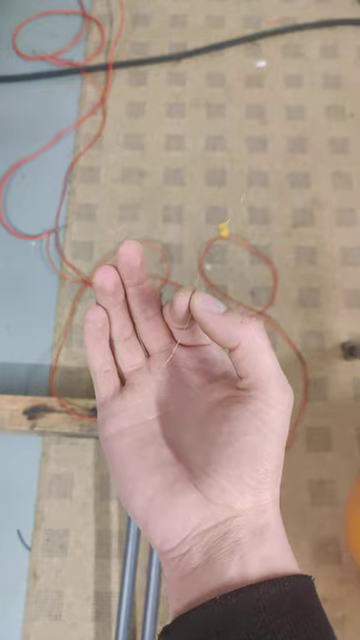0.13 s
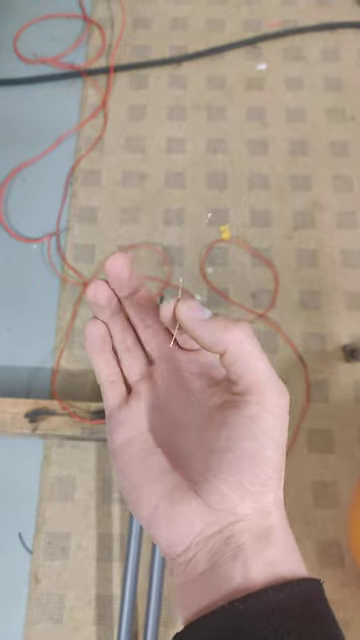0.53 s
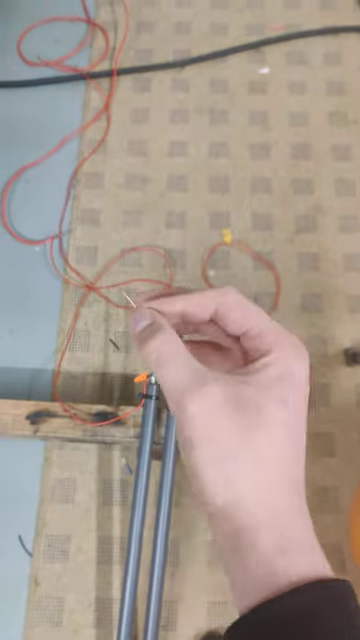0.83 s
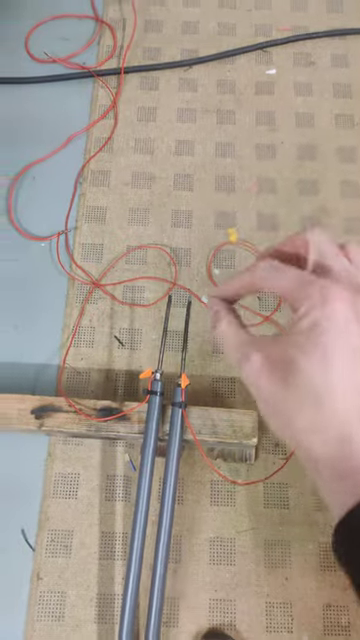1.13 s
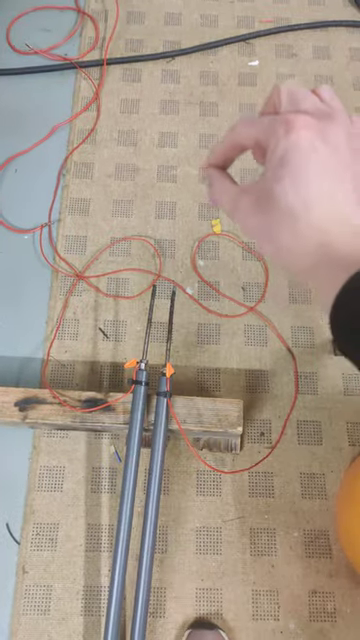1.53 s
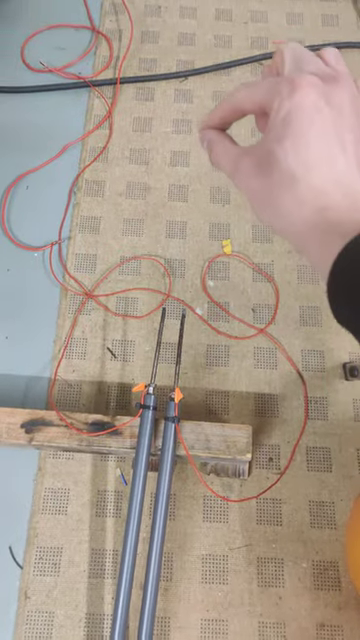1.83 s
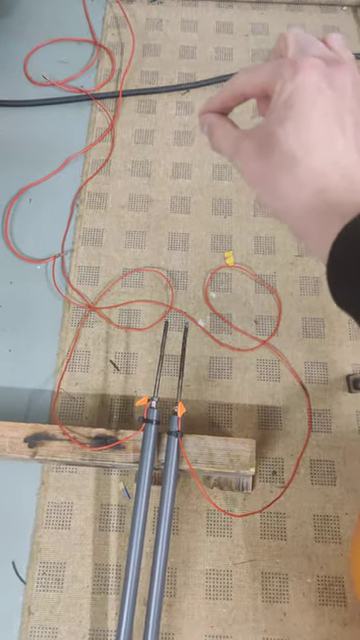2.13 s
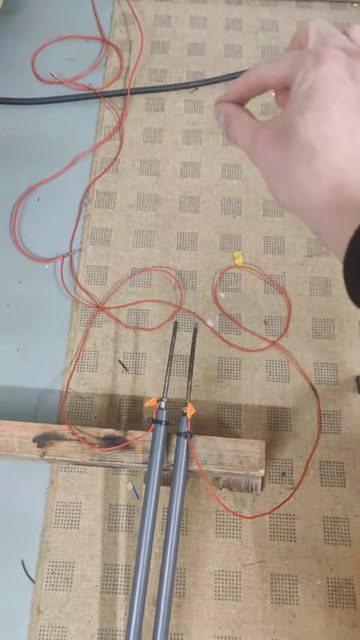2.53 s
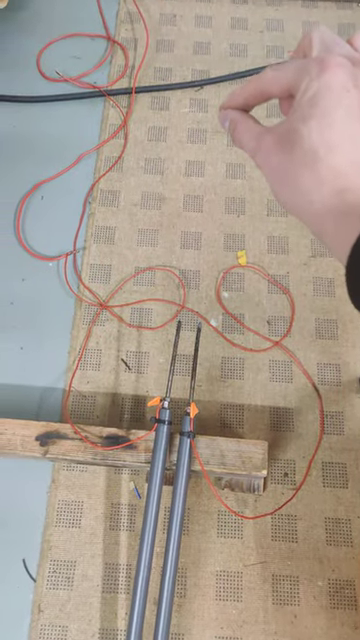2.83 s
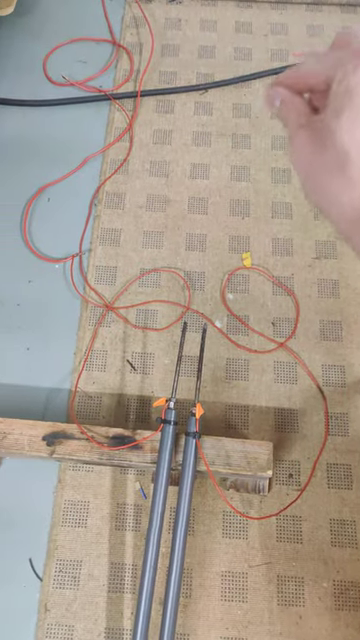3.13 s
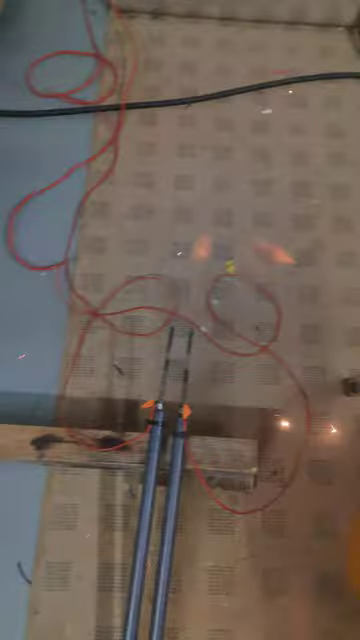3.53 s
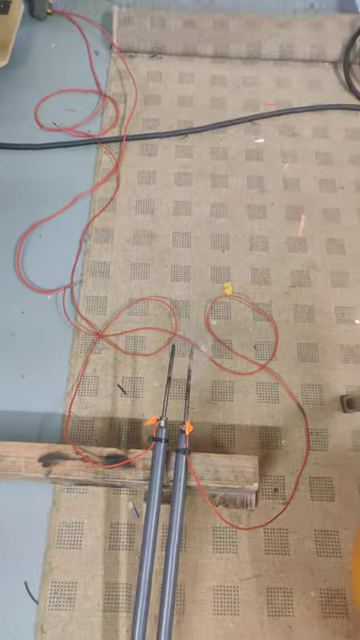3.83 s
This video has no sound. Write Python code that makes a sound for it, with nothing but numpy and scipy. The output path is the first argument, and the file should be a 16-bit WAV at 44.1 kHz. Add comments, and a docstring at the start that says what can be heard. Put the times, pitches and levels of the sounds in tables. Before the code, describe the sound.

A violent electric arc explosion cracks suddenly in a quiet workshop, its boom ringing away.

```python
"""A quiet workshop heard by two microphones in one hand-held housing, as filtered noise and struck resonators.
The sound fades in on hiss, finger clicks and the tremor and bumps of the hand, mostly in the right microphone;
a short run of ticks in the housing follows, then a soft rustle of cloth. A wire across two electrodes explodes:
an arc of one-sided pops, random sparks and roaring noise sets the room ringing. The startled hand shakes on,
a sub-bass pair beats, and three ember spits fall in the dying room sound."""
import sys
import numpy as np
from scipy import signal
from scipy.fft import rfft, irfft
from scipy.io import wavfile
from scipy.ndimage import uniform_filter1d

SR = 44100
rng = np.random.default_rng(int(sys.argv[2]) if len(sys.argv) > 2 else 0)


def transcribe(u):
    """Save the signal u as a 16-bit wav file named by the first command-line argument.

    u: samples, shape (n,) or (channels, n), limited to [-1, 1]; the rate is SR.
    q: integer samples, one column per channel.
    """
    v = np.clip(np.atleast_2d(u).T, -1, 1)
    q = np.round(v * 32767).astype(np.int16)
    wavfile.write(sys.argv[1], SR, q)


N = 176400

# Loudest pressure pulses of the arc. Each row: start in seconds, peak in dB, left minus right in dB,
# decay constant in ms.
POPS = [(3.3258, -11, -3, .15), (3.329, -10, 0, .15), (3.3317, -8, 0, .2), (3.3327, -5, -1, .2),
        (3.3335, -10, 2, .15), (3.3365, -2, -2, .35), (3.3378, -8, 0, .4), (3.3438, -6, 7, .2),
        (3.3487, -12, 4, .2), (3.3535, -4, 2, .25), (3.3547, -10, -6, .3), (3.3655, -9, 2, .4),
        (3.368, -10, 4, .3), (3.3727, -9, 3, .5)]
POP_RISE_S, POP_OVERSHOOT, POP_TOP_HZ = 2.5e-5, 0.6, 6500

# Noise of the burning arc. Each row: time in seconds, relative level at 1 kHz in dB, brightness in dB per octave.
ARC = [(3.321, -75, -8), (3.325, -25, 5.5), (3.333, -26, 3), (3.345, -32, -4), (3.37, -26.5, -0.5),
       (3.40, -34, -5.5), (3.45, -30, 0), (3.475, -26, 0), (3.50, -31, -6), (3.52, -46, -8)]
# Fixed colour of the arc noise. Each row: frequency in Hz, relative density in dB per Hz.
ARC_COLOUR = [(40, -31), (70, -12), (125, -18.5), (200, -10), (317, -3), (420, -6), (900, -4), (1200, -8.5),
              (2500, -11.5), (6000, -21), (9000, -33), (16500, -37)]
ARC_GAIN_DB = 11.5

# Crackle: births per second in each channel, relative level, mean size excess in dB, fall time constant.
SPARKS_PER_S, SPARK_DB, SPARK_SPREAD_DB, SPARK_FALL_S = 3300, -16, 3.7, 0.000078
SPARKS_RISE_S, SPARKS_T60_S = 0.0128, 0.22   # the crackle thins as the wire is consumed
# Late spits of falling embers. Each row: start in seconds, strength before filtering in dB, centre in Hz.
EMBERS = [(3.847, -60, 6000), (3.914, -58, 3000), (3.945, -58, 15000)]

# First stage of the room's decay. Each row: frequency in Hz, 60 dB decay time in seconds.
ROOM_T60 = [(60, 1.02), (250, 0.66), (700, 0.68), (2000, 0.58), (5000, 0.57), (9000, 0.42), (12000, 0.53),
            (15000, 0.63)]
# Weaker second stage of the decay. Each row: frequency in Hz, power relative to the first stage in dB.
LATE = [(100, -11), (1000, -16), (5000, -15.5), (9000, -10.5), (15000, -9)]
LATE_LONGER = 2.09       # ratio of second to first decay time
ROOM_BUILDUP = 0.0036    # share of the arc's power stored by the room at each sample
# Correlation of the two channels. Each row: frequency in Hz, left-right likeness from -1 to 1.
LIKENESS = [(60, 0.58), (130, 1), (290, 0.68), (640, 0.074), (1400, 0.13), (3000, -0.0099), (6000, -0.041),
            (9000, -0.1), (15000, -0.7)]
# Balance of the roar. Each row: frequency in Hz, left minus right in dB.
SIDES = [(60, 3), (380, 1), (2400, 1.5), (5000, -2), (9000, -0.5), (15000, -3)]

# Long resonances of room and bench. Each row: frequency in Hz, relative level in dB, 60 dB decay time in seconds.
RINGS = [(67.3, -25.5, 1.74), (89.3, -30, 1.2), (153.37, -33, 2.26), (240, -27.5, 0.31), (312, -25.5, 0.82),
         (324.7, -25, 0.63), (352, -38, .5), (512, -26.5, 0.3), (662, -31, 0.77), (800.5, -35.5, 0.71),
         (824.7, -25, 0.24), (962, -31.5, 0.71), (1004, -32, 0.61)]
# Pressure surges that strike them. Each row: time in seconds, relative strength in dB,
# brightness in dB per octave about 300 Hz.
SURGES = [(3.335, -8.5, 4), (3.37, -0.5, 1.5), (3.42, -10, -0.5), (3.465, -0.5, 0), (3.49, -7.5, 0.5)]
# Two close sub-bass resonances of the building, set going in opposition: their mean and difference in Hz.
BOOM_S, BOOM_DB, BOOM_HZ, BOOM_BEAT_HZ, BOOM_T60_S = 3.41, -29.5, 26.75, 6.15, 5

# The startled hand jerks and shakes on.
FLINCH_S, FLINCH_DB, FLINCH_HZ, FLINCH_T60_S, FLINCH_RISE_S = 3.525, -12.5, 9.7, 3.24, 0.013
# Tremor of the holding hand. Each row: time in seconds, level in dB.
TREMOR = [(.13, -58), (.2, -36.5), (.7, -35.5), (1.15, -26), (1.7, -34), (2.2, -37.5), (2.7, -35.5),
          (3.1, -39.5), (3.3, -25), (3.45, -37), (3.6, -37), (4.0, -17)]
TREMOR_HZ, TREMOR_WIDTH_HZ, TREMOR_LEFT_DB = 10.5, 8.0, -24
# Fingers shifting on the housing: mean level, upper edge, share of the tremor level followed, depth of lumps.
RUB_DB, RUB_TOP_HZ, RUB_FOLLOWS, RUB_LUMPS_DB, RUB_LEFT_DB = -59, 83.4, 0.46, 4.5, -10
# Grip bumps. Each row: start in seconds, strength before damping in dB, pitch in Hz.
BUMPS = [(0.146, -48, 60.5), (1.02, -29, 55), (1.108, -26.5, 110), (1.275, -36, 69.6), (1.298, -29, 154),
         (1.441, -41, 88), (1.552, -34, 60), (1.848, -34, 90), (2.125, -26, 87), (2.357, -34, 86),
         (2.788, -45, 54.7), (3.209, -29, 107)]
BUMP_CYCLES = 3          # cycles in a 60 dB decay
# Ticks inside the housing. Each row: start in seconds, strength before damping in dB.
TICKS = [(.927, -36), (0.996, -37.5), (1.063, -37), (1.131, -40), (1.198, -38), (1.261, -41),
         (1.327, -42.5), (1.393, -53)]
TICK_HZ, TICK_T60_S = 281, 0.034
HOUSING_LEFT_DB, HOUSING_TOP_HZ = -26, 380
# Finger clicks on the housing. Each row: start in seconds, strength before damping in dB.
CLICKS = [(0.1449, -34), (.169, -41), (0.289, -39)]
CLICK_HZ, CLICK_T60_S, CLICK_LEFT_DB = 660, 0.00063, -3

# Soft rustle of cloth as the arm moves. Each row: time in seconds, level in dB.
RUSTLE = [(0, -91), (.9, -82), (1.3, -78), (1.7, -77), (1.87, -63.5), (2.0, -66), (2.15, -68), (2.45, -76),
          (2.9, -82)]
RUSTLE_LOW_HZ, RUSTLE_TOP_HZ, RUSTLE_PAN_DB = 350, 2400, 0.5
# Room air and microphone hiss. Each row: time in seconds, level above 1.5 kHz in dB, left minus right in dB.
AIR = [(.07, -87, 15), (.14, -83, -12), (.25, -72, 15), (.44, -69, -0.5), (.8, -66, 0), (1.28, -64, -1.5),
       (1.6, -65, -1.5), (1.87, -67, 1), (2.2, -72, 3), (2.7, -67.5, 0), (3.0, -71, 2), (3.2, -72, -15)]
# Spectrum of the hiss. Each row: frequency in Hz, relative density in dB per Hz.
HISS = [(30, -3), (45, -19.5), (98, -31), (409, -34), (2100, -41), (5000, -45.5), (8500, -49),
        (12000, -44.5), (16500, -47)]

OPEN_S, OPEN_FADE_S = 0.07, 0.017   # the sound fades in
# Microphone colour. Each row: centre in Hz, width in Hz, boost in dB.
MIC = [(8460, 3450, -1.5), (15500, 3500, 6.5)]
CEILING, CUTOFF_HZ = 1.5, 15800


def from_db(db):
    """Amplitude ratio is ten to the power of decibels over twenty."""
    return 10 ** (np.asarray(db) / 20)


def rms_one(x):
    """Dividing by the root mean square gives unit mean power."""
    return x / np.sqrt(np.mean(x ** 2) + 1e-30)


def in_time(rows):
    """Linear interpolation turns each column of a time table into one value per sample."""
    s, *columns = np.transpose(rows)
    return [np.interp(np.arange(N) / SR, s, c) for c in columns]


def at_hz(points, hz):
    """Interpolation on a logarithmic frequency axis reads a spectrum table."""
    table_hz, values = np.transpose(points)
    return np.interp(np.log(hz), np.log(table_hz), values)


def pan(db):
    """A level difference is shared equally between left and right gains."""
    return from_db(np.array([db / 2, -db / 2]))


def band_pass(x, low_hz, high_hz, order=1):
    """Butterworth filtering passes one band of frequencies."""
    return signal.sosfilt(signal.butter(order, [low_hz, high_hz], "band", fs=SR, output="sos"), x)


def low_pass(x, top_hz, order):
    """Butterworth filtering removes the high frequencies."""
    return signal.sosfilt(signal.butter(order, top_hz, fs=SR, output="sos"), x)


def bands(x):
    """Third-octave analysis; alternate bands draw on separate stereo signals so neighbours are unrelated."""
    edges = 32 * 2 ** np.arange(0, 9.2, 1 / 3)
    for k, (low, high) in enumerate(zip(edges, edges[1:])):
        yield np.sqrt(low * high), band_pass(x[k % 2], low, high, order=2)


def ring(s, sizes, hz, t60):
    """Impulse response of a damped resonator: each impulse at times s starts a dying sine."""
    impulses = np.full(N, 1e-18)   # a tiny floor avoids slow arithmetic
    impulses[(np.asarray(s) * SR).astype(int)] = sizes
    r = from_db(-60 / (t60 * SR))
    w = 2 * np.pi * hz / SR
    return signal.lfilter([0, np.sin(w)], [1, -2 * r * np.cos(w), r * r], impulses)


def peak(x, hz, width_hz, db):
    """A second-order resonance in the response gives a bell-shaped boost or cut."""
    w, a = 2 * np.pi * hz / SR, from_db(db / 2)
    q = np.tan(np.pi * width_hz / SR)
    return signal.lfilter([1 + q * a, -2 * np.cos(w), 1 - q * a], [1 + q / a, -2 * np.cos(w), 1 - q / a], x)


def pops():
    """One-sided pressure pulses: sudden drop, exponential return, slight overshoot."""
    out, t = np.zeros((2, N)), np.arange(400) / SR
    for s, db, pan_db, ms in POPS:
        u, i = t / (ms / 1000), int(s * SR)
        drop = 1 - np.exp(-t / POP_RISE_S)
        pulse = low_pass(drop * (1 - POP_OVERSHOOT * u) * np.exp(-u), POP_TOP_HZ, 2)
        out[:, i:i + len(t)] -= from_db(db) * pan(pan_db)[:, None] * pulse / pulse.max()
    return out


def sparks():
    """Shot noise: random negative impulses, each with an exponential fall, under a dying envelope."""
    t = np.arange(N) / SR - ARC[0][0]
    born = rng.random((2, N)) < SPARKS_PER_S / SR
    sizes = from_db(SPARK_SPREAD_DB * np.minimum(rng.exponential(1, (2, N)), 4))
    r = np.exp(-1 / (SPARK_FALL_S * SR))
    pulses = signal.lfilter([-1], [1, -r], born * sizes + 1e-18)
    crackle = signal.lfilter([1, -1], [1, -.97], pulses)   # removes the steady pressure
    rise = np.clip(t / SPARKS_RISE_S, 0, 1) ** 2
    return crackle * rise * from_db(SPARK_DB - 60 * np.maximum(t, 0) / SPARKS_T60_S)


def roar():
    """Reverberant energy balance: each band's power builds with the arc and dies in two exponential stages."""
    start = int(ARC[0][0] * SR)
    level_db, tilt = (c[start:] for c in in_time(ARC))
    burning = np.arange(start, N) < ARC[-1][0] * SR
    out = np.zeros((2, N))
    for hz, (mid, side) in bands(rng.standard_normal((2, 2, N - start))):
        band_db = level_db + tilt * np.log2(hz / 1000) + at_hz(ARC_COLOUR, hz)
        power = burning * from_db(2 * band_db)
        r = from_db(-120 / (at_hz(ROOM_T60, hz) * SR))   # power decays at twice the dB of amplitude
        early = signal.lfilter([1], [1, -r], power)
        late = signal.lfilter([1], [1, -r ** (1 / LATE_LONGER)], power)
        held = power + ROOM_BUILDUP * (early + from_db(2 * at_hz(LATE, hz)) * late)
        alike = np.clip(at_hz(LIKENESS, hz), -1, 1)
        both = np.sqrt(1 + alike) * mid + np.sqrt(1 - alike) * side * [[1], [-1]]
        out[:, start:] += np.sqrt(held) * both * pan(at_hz(SIDES, hz))[:, None]
    return from_db(ARC_GAIN_DB) * out


def rings():
    """Modal excitation: each surge strikes every resonance with a slightly different strength."""
    s, db, tilt = np.transpose(SURGES)
    out = np.zeros(N)
    for hz, level_db, t60 in RINGS:
        strike_db = db + level_db + tilt * np.log2(hz / 300) + rng.normal(0, 1.0, len(s))
        out += ring(s, -from_db(strike_db), hz, t60)
    return out


def boom():
    """Beating: two close modes started in opposite phase alternately cancel and reinforce."""
    return sum(ring([BOOM_S], side * from_db(BOOM_DB), BOOM_HZ + side * BOOM_BEAT_HZ / 2, BOOM_T60_S)
               for side in (-1, 1))


def embers():
    """Short noise bursts: band-passed noise under an exponential decay."""
    out = np.zeros((2, N))
    decay = np.exp(-np.arange(200) / 60)
    for s, db, hz in EMBERS:
        i = int(s * SR)
        noise = band_pass(rng.standard_normal((2, 200)), hz / 5.2, min(hz * 3.1, 19000))
        out[:, i:i + 200] += from_db(db) * decay * noise
    return out


def flinch():
    """Damped oscillation: a slow dying swing of the hand after the bang."""
    t = np.maximum(np.arange(N) / SR - FLINCH_S, 0)
    envelope = from_db(FLINCH_DB - 60 * t / FLINCH_T60_S) * (1 - np.exp(-t / FLINCH_RISE_S))
    return np.sin(2 * np.pi * FLINCH_HZ * t) * envelope * from_db([[TREMOR_LEFT_DB], [0]])


def tremor(level_db):
    """Narrow-band random vibration: noise about the hand's shaking rate, strongest on the right."""
    noise = rng.standard_normal((2, N + SR))   # the first second lets the filter settle
    shake = band_pass(noise, TREMOR_HZ - TREMOR_WIDTH_HZ / 2, TREMOR_HZ + TREMOR_WIDTH_HZ / 2)[:, SR:]
    return rms_one(low_pass(shake, 28, 4)) * from_db(level_db) * from_db([[TREMOR_LEFT_DB], [0]])


def rub(tremor_db):
    """Friction noise: a low band whose level wanders in lumps and partly follows the tremor."""
    noise = rms_one(band_pass(rng.standard_normal((2, N + SR)), 35, RUB_TOP_HZ)[:, SR:])
    lumps = rms_one(low_pass(rng.standard_normal(N + SR), 8.0, 1)[SR:])
    lumps = uniform_filter1d(lumps, size=800)
    follow_db = RUB_FOLLOWS * np.minimum(tremor_db + 25.5, 8)
    return noise * from_db(RUB_DB + RUB_LUMPS_DB * lumps + follow_db) * from_db([[RUB_LEFT_DB], [0]])


def knocks():
    """Struck damped resonators: grip bumps and housing ticks, dulled and strongest on the right."""
    bumps = sum(ring([s], from_db(db), hz, BUMP_CYCLES / hz) for s, db, hz in BUMPS)
    s, db = np.transpose(TICKS)
    ticks = -ring(s, from_db(db), TICK_HZ, TICK_T60_S)
    return low_pass(bumps + ticks, HOUSING_TOP_HZ, 4) * from_db([[HOUSING_LEFT_DB], [0]])


def hand():
    """Structure-borne sound: shake, rubbing and knocks reach mostly the right microphone."""
    level_db, = in_time(TREMOR)
    return tremor(level_db) + rub(level_db) + knocks()


def clicks():
    """Heavy damping: resonances that die within a cycle give tiny dry steps of pressure."""
    s, db = np.transpose(CLICKS)
    return ring(s, from_db(db), CLICK_HZ, CLICK_T60_S) * from_db([[CLICK_LEFT_DB], [0]])


def rustle():
    """Friction of cloth: dull band-passed noise, a little to the left."""
    level_db, = in_time(RUSTLE)
    noise = band_pass(rng.standard_normal((2, N)), RUSTLE_LOW_HZ, RUSTLE_TOP_HZ)
    return rms_one(noise) * from_db(level_db) * pan(RUSTLE_PAN_DB)[:, None]


def air():
    """Uncorrelated noise: white noise shaped in the spectrum, independent in each microphone."""
    level_db, pan_db = in_time(AIR)
    noise = rng.standard_normal((2, N))
    hz = np.maximum(np.arange(N // 2 + 1) * SR / N, 1)
    shape = from_db(at_hz(HISS, hz))
    shape = shape / np.sqrt(2 * np.sum(shape[hz > 1500] ** 2) / N)   # unit rms above 1.5 kHz
    return irfft(rfft(noise) * shape, N) * from_db(level_db) * pan(pan_db)


def scene():
    """Superposition: the pressures of all sources add at the two microphones."""
    arc = pops() + sparks() + roar()
    response = rings() + boom() + embers()
    handling = flinch() + hand() + clicks()
    return arc + response + handling + rustle() + air()


def record(dry):
    """Saturation and filtering: a fade-in, rounded peaks, coloured treble and a steep upper cutoff."""
    opened = np.clip((np.arange(N) / SR - OPEN_S) / OPEN_FADE_S, 0, 1)
    out = CEILING * np.tanh(dry * opened / CEILING)
    for hz, width_hz, db in MIC:
        out = peak(out, hz, width_hz, db)
    return signal.sosfilt(signal.ellip(10, .5, 55, CUTOFF_HZ, fs=SR, output="sos"), out)


dry = scene()
out = record(dry)
transcribe(out)
```